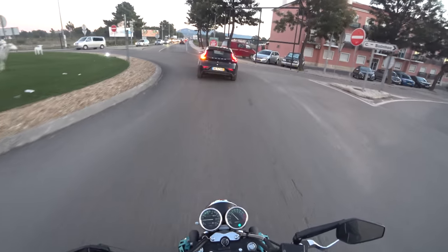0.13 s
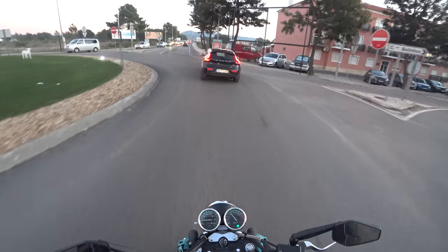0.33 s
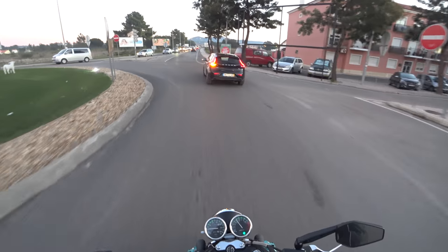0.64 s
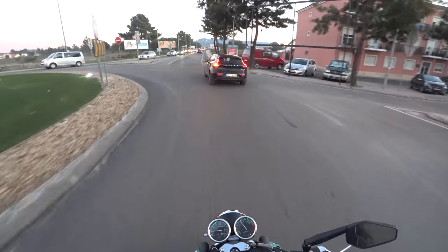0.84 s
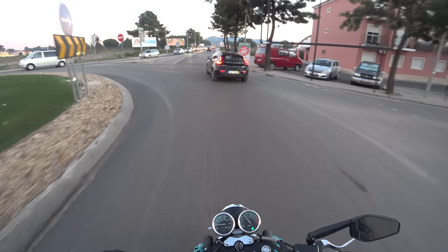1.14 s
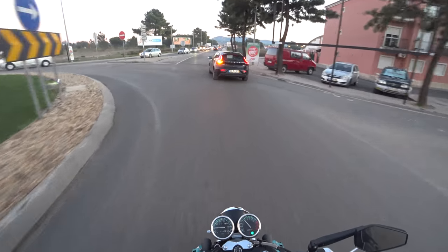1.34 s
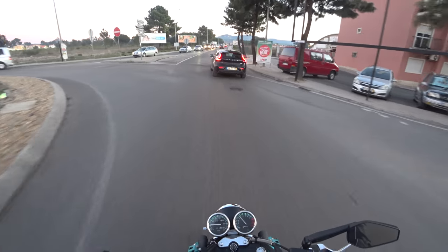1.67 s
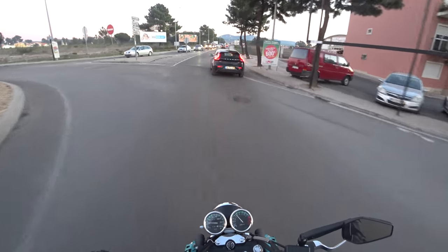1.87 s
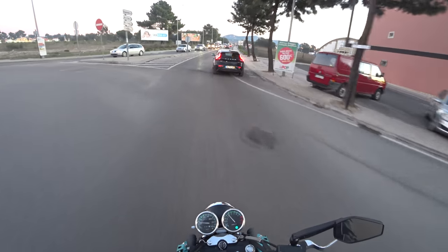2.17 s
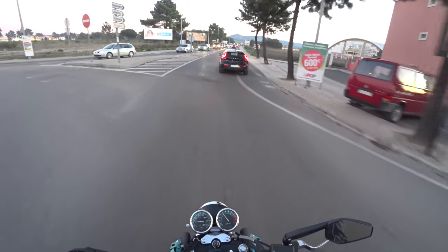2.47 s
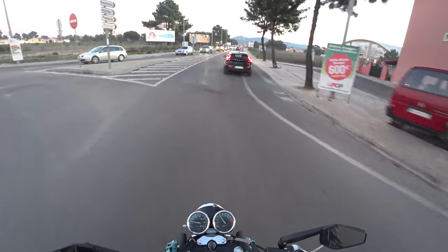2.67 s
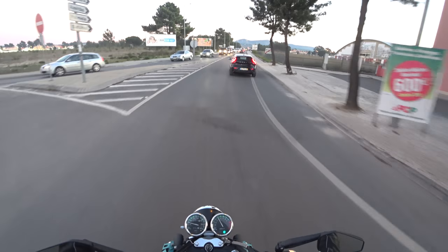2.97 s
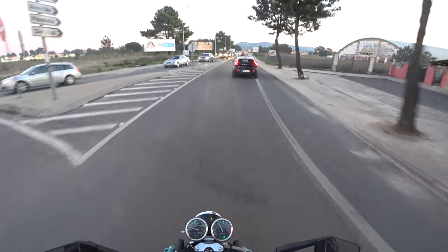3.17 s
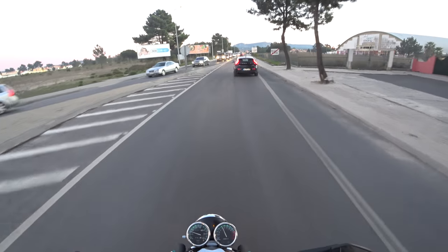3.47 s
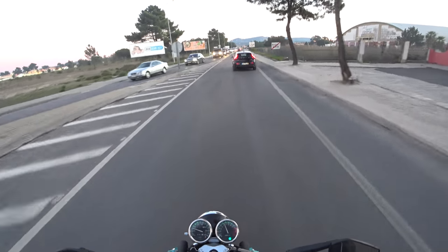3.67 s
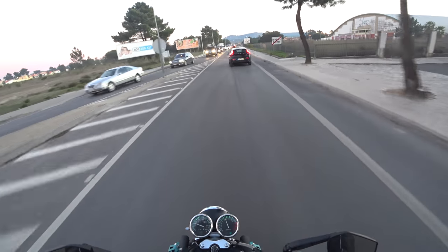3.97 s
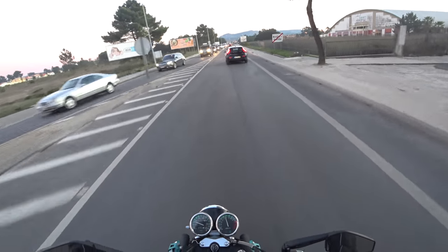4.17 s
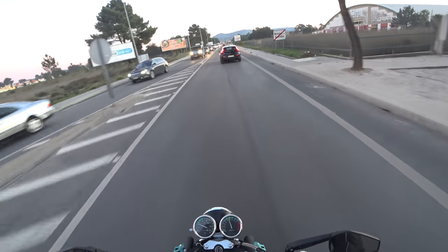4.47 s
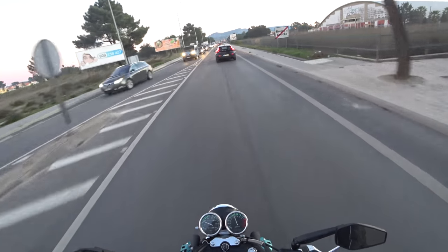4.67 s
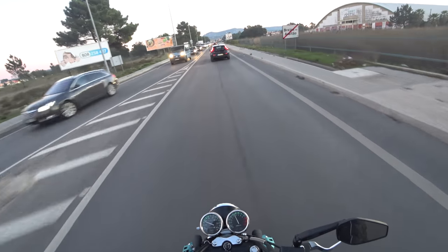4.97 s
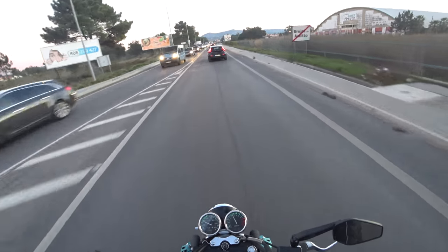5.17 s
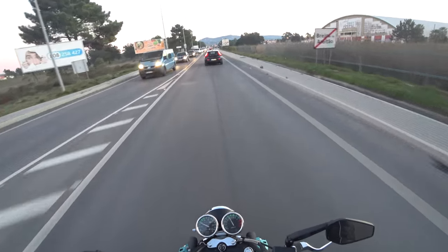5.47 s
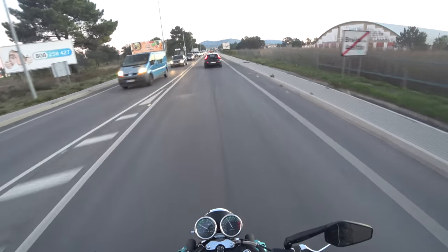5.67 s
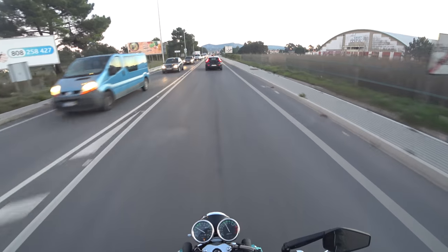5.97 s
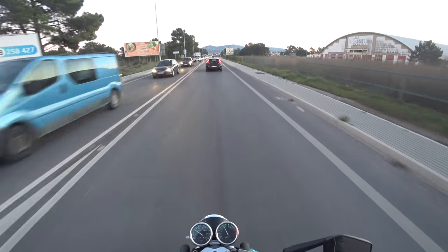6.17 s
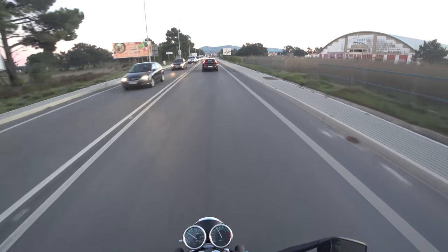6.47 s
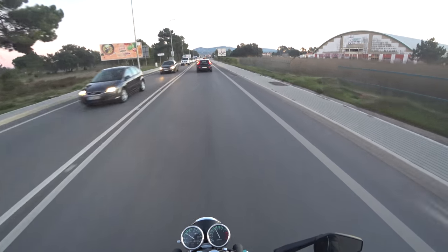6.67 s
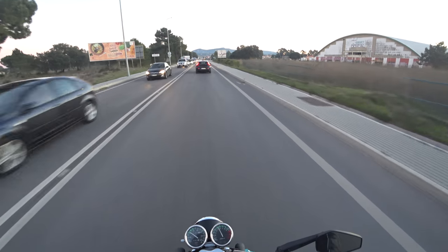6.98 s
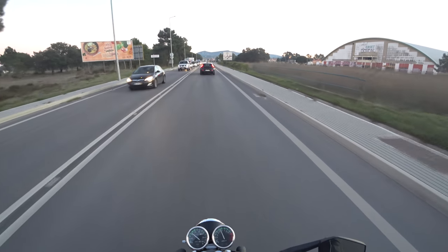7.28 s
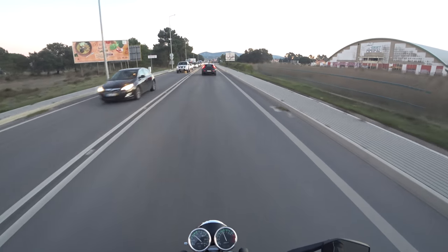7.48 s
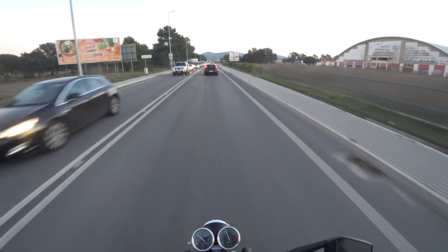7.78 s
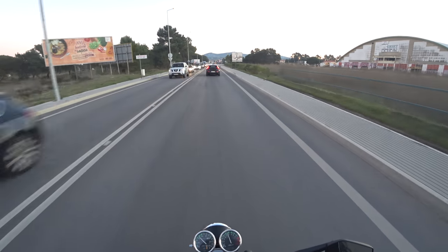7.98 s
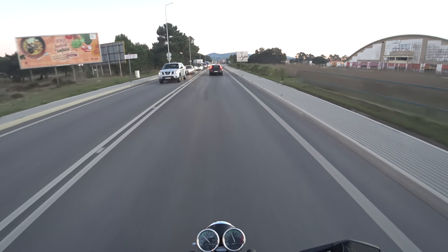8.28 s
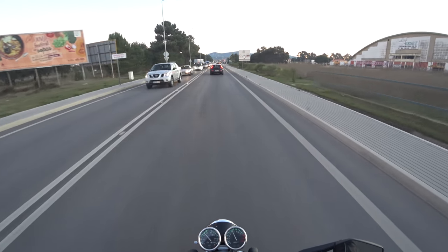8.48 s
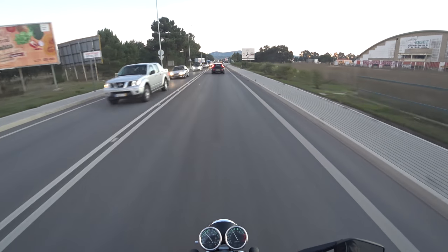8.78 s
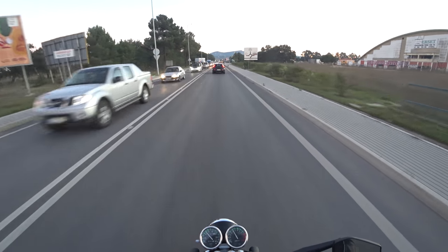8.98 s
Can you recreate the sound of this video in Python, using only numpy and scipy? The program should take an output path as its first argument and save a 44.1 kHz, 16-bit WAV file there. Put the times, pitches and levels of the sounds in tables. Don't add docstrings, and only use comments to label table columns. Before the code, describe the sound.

Inside a motorcyclist's helmet on an open road, a thumping one-cylinder engine rises in pitch and drops through three upshifts. The throttle cuts bring faint pops at the first, a loud quick cluster at the second, and two crackly ones at the third. Hollow boom, metallic exhaust ring, gas hiss and valve ticking sit close in stereo above tyre and wind noise.

```python
import sys
import numpy as np
from scipy import signal
from scipy.fft import rfft, irfft, next_fast_len
from scipy.io import wavfile
from scipy.ndimage import uniform_filter1d

SR = 44100
rng = np.random.default_rng(int(sys.argv[2]) if len(sys.argv) > 2 else 0)


def linear_from_db(decibels):
    return 10 ** (np.asarray(decibels, float) / 20)


def generate_wav(sig):
    pcm = np.round(np.clip(np.atleast_2d(sig).T, -1, 1) * 32767).astype(np.int16)
    wavfile.write(sys.argv[1], SR, pcm)


N = 402191
T = np.arange(N) / SR
SIZE = next_fast_len(N + 8192)
HZ = np.arange(SIZE // 2 + 1) * SR / SIZE
SNAP_S = 0.095

# centre_hz, width_hz, left_db, right_db, right_lead_rad
BOOM = [(102.4, 47, -24.5, -19, 0.5), (162, 170, -18.5, -41, -2), (234, 39, -21, -13, -1.4),
        (298.3, 45.4, 5.5, 8, -0.97), (371, 51, -1, -8, 2.44)]
PIPE = [(432.5, 102, -8, -7.5, -0.5), (552.3, 46, -4.5, -6, -2.5), (675.5, 88, -14.5, -9, 0.94),
        (782.7, 46.7, 0.5, 0.5, -2), (885, 136, 3, -1.5, -2.5), (1026, 86, -9, -12, -2),
        (1135, 170, -11, -11, -3), (1346, 290, -16.5, -15.5, -3), (1466, 400, -15, -17.5, -2.5),
        (1720, 110, -18.5, -10.5, -2.5), (1890, 150, -22.5, -19, -1.5)]
SHELL = [(1700, 1150, 6, 6, -2.5), (2453, 290, 3, 5.5, -2), (2795, 640, -1, -1, 0.6),
         (4270, 3360, -6.5, -4, 3)]
VENT = [(4840, 440, 0, 2.5, -1.1), (5560, 1040, 3.5, 6.5, -1.58), (7170, 1240, -4.5, -8.5, -1),
        (10070, 4300, -13, -17.5, 0.6)]
# firing_hz, level_db, lag_turns
BOOM_BY_REVS = [(35, -0.5, 0.034), (38.3, -3, -0.0068), (39.9, -2.5, -0.053), (43.13, -5.5, 0.056),
                (45.57, -3, 0.252), (48, -2.5, 0.486), (47.9, -2.5, 0.507), (55.3, -1.5, 0.481)]


def level(x, db):
    return x * linear_from_db(db) / np.sqrt(np.mean(x ** 2))


def ring(x, modes):
    hz, width, left_db, right_db, lead = np.transpose(modes)[:, :, None]
    grid = np.linspace(0, SR / 2, 4097)
    shape = np.minimum(grid / hz, 1) / (1 + ((grid - hz) / (width / 2)) ** 2)
    gain = np.sqrt([np.sum((linear_from_db(db) * shape) ** 2, axis=0) + 1e-12 for db in (left_db, right_db)])
    cepstrum = irfft(np.log(gain).mean(axis=0))
    phase = 2 * rfft(cepstrum[:4096], 8192).imag
    phase = phase + np.outer([0, 1], np.interp(grid, hz[:, 0], lead[:, 0]))
    gain = [np.interp(HZ, grid, g) * np.exp(1j * np.interp(HZ, grid, p)) for g, p in zip(gain, phase)]
    return irfft(rfft(x, SIZE) * gain, SIZE)[:, :N]


def driven(x, modes, db):
    return level(ring(x, modes), 0) * linear_from_db(db)


def noise(alike):
    common, left, right = rng.standard_normal((3, N))
    alike = np.clip(alike, 0, 1)
    return np.sqrt(alike) * common + np.sqrt(1 - alike) * np.array([left, right])


def colour(x, points):
    hz, db = np.transpose(points)
    return irfft(rfft(x, SIZE) * linear_from_db(np.interp(np.log(HZ + 1), np.log(hz), db)), SIZE)[:, :N]


def walk(rate):
    hold = int(SR / rate)
    steps = np.repeat(rng.standard_normal(N // hold + 1), hold)
    return 1.1 * uniform_filter1d(uniform_filter1d(steps, hold), hold)[:N]


def bump(s, length):
    return np.exp(-((T - s) / length) ** 2)


def clicks(seconds, size):
    out = np.zeros(N + 1)
    at = np.clip(seconds * SR, 0, N - 1)
    whole = at.astype(int)
    np.add.at(out, whole, size * (1 + whole - at))
    np.add.at(out, whole + 1, size * (at - whole))
    return out[:N]


def road(road_db, gust_db):
    # centre_hz, width_hz, left_db, right_db, right_lead_rad
    roar = [(393, 100, -10.5, -9.5, -1), (513, 46, -14, -4.5, -2.5), (684, 196, -7.5, -26, -.5),
            (839, 72, -2, -3, 0), (903, 170, -16, -17, -2), (1101, 130, -10.5, -4.5, -1.5),
            (1310, 240, -12, -11.5, -2.5), (1621, 250, -10.5, -8, -2), (1813, 137, -10, -9, -1.5)]
    # pitch_hz, level_db (per Hz)
    rumble = [(12, -59), (20, -16), (48, -16.5), (107, -3.5), (178, -7.5), (240, 4), (310, -50),
              (530, -120)]
    # time_s, level_db
    wind = [(0.0, -93), (0.62, -61.5), (0.9, -64.5), (1.1, -71.5), (4.11, -78), (4.37, -64), (7.16, -66),
            (7.6, -66), (8.03, -59.5), (9.12, -61)]
    out = driven(noise(0.67), SHELL, road_db + gust_db + walk(8))
    out += driven(noise(0.6), roar, road_db + 4.5 + walk(.6) + walk(12))
    buffet = linear_from_db(np.interp(T, *np.transpose(wind)) + 3 * walk(12))
    return out + level(colour(noise(0.52), rumble + [(500, -39)]), 1.14) * buffet


def gas(gas_db, turns):
    # centre_hz, width_hz, left_db, right_db, right_lead_rad
    visor = [(7820, 1800, -1, 3, -0.33), (10100, 3300, -2, -6, 0.36)]
    # time_s, level_db, length_s
    whistles = [
        (0.196, 2, 0.29),
        (2.7, 5, 0.28),
        (3.003, 5.5, 0.16),
        (3.7, 9, 0.082),
        (6.499, -1, 0.37),
        (7.5, 3.5, .3),
    ]
    pulse = 1 + 0.2 * np.cos(2 * np.pi * (turns - .3))
    out = driven(pulse * noise(0.86), VENT, gas_db + 0.58 * walk(24))
    whistle_db = sum(db * bump(s, length) for s, db, length in whistles)
    flutter_db = walk(3) + 3.5 * walk(9)
    return out + driven(noise(0.84), visor, gas_db - 17.5 + whistle_db + flutter_db)


def valve(tick_db, turns, cycle):
    late_s = .0003 * rng.standard_normal(len(cycle))
    size = linear_from_db(1.8 * rng.standard_normal(len(cycle)))
    tap = clicks(np.interp(cycle + .48, turns, T) + late_s, size)
    rattle = signal.oaconvolve(tap, np.exp(-T[:300] / .0013))[:N] * rng.standard_normal(N)
    # centre_hz, width_hz, left_db, right_db, right_lead_rad
    seat = [(5890, 1204, 16.0, 17.0, -1.66), (6820, 299, 7.5, 2.0, -0.96), (8890, 2800, -8.0, -8.0, 0.022)]
    return driven(.32 * rattle + .7 * tap, seat, tick_db + 1.0)


def pops():
    # time_s, peak_db, crack_db (over peak), return_ms, return_db
    bursts = [
        (0.932, -34, -30, 16.15, -4),
        (4.291, -25, -35, 13.8, -8),
        (4.331, -22.5, -36, 22, -4),
        (4.4486, -13.5, -29, 15.8, -0.5),
        (4.553, -32, -20, 13, -5),
        (4.641, -19, -38, 11.3, -4),
        (8.037, -27, -19, 16.4, -16),
        (8.145, -23.5, -39, 11.4, 3),
    ]
    # lag_s, size
    chatter = [
        (.0002, 6.5),
        (.0014, 2.7),
        (.0026, 6),
        (.0038, 8.7),
    ]
    # centre_hz, width_hz, left_db, right_db, right_lead_rad
    knock = [(794, 120, 0.5, -3.5, -2), (980, 270, 0, -4, -3), (1220, 300, -22.5, -3.5, -3),
             (1580, 360, -2, -3.5, -2.5)]
    # centre_hz, width_hz, left_db, right_db, right_lead_rad
    clunk = [(570, 81, -7, -10, -1.1), (1015, 125, -1, -1, -1.7), (1480, 150, -8, -6, -1.1)]
    body, crack = np.zeros(N), np.zeros(N)
    t = np.arange(2000) / SR
    for s, db, crack_db, back_ms, back_db in bursts:
        grit = rng.standard_normal(2000)
        blow = sum(size * np.exp(-np.abs(t - lag) / .00006) for lag, size in chatter)
        blow = blow + .5 * np.exp(-t / 0.001) * grit
        since = t - back_ms / 1000
        back = (t > back_ms / 1000) * np.exp(-np.abs(since) / 0.0086) * grit
        snap = np.exp(-np.abs(t - .001) / .0012) * grit
        back_snap = back * (.3 + 2 * np.exp(-np.abs(since) / .001))
        at = int((s - .0015) * SR)
        body[at:at + 2000] += linear_from_db(db) * (blow + linear_from_db(back_db + 5.0) * back)
        crack[at:at + 2000] += linear_from_db(db + crack_db) * (snap + back_snap)
    body = uniform_filter1d(body, size=7)
    out = linear_from_db(0.5) * ring(body, knock) + linear_from_db(-30) * ring(body, PIPE)
    out += linear_from_db(-11.5) * ring(body, BOOM) + linear_from_db(-25.5) * ring(body, SHELL)
    out += linear_from_db(8.0) * ring(crack, [(2680, 1600, -1.0, 3.0, -1.4)] + VENT[:2])
    return out + linear_from_db(-2.5) * ring(body, clunk)


def stroke(turns, orders=slice(0, 48)):
    # order, level_db, arrival_turns
    blow = [(0.99, 9, -.1), (6.64, 12, 0.012), (7.8, 9, 0.031), (9.8, 10, -0.029), (12.1, 11.5, -0.021),
            (13.95, 12.5, -0.014), (17.4, 8, 0.049), (17, 8, 0.017), (20.64, 8.5, 0.012), (25, 4.5, 0.022),
            (25.8, 1, 0.046), (27.9, 11, 0.045), (31.8, 6.5, 0.1), (48, 0, 0.23)]
    order = np.arange(1, 49)
    at, db, late = np.transpose(blow)
    turn = np.cumsum(np.interp(order, at, late))
    partials = linear_from_db(np.interp(order, at, db)) * np.exp(-2j * np.pi * turn)
    lines = np.zeros(2049, complex)
    lines[order[orders]] = partials[orders]
    return np.interp(turns % 1, np.arange(4097) / 4096, np.resize(irfft(lines), 4097))


def exhaust_blows(turns, hz):
    # firing_hz, trip_ms
    trip_by_revs = [(35, 5.18), (40, 4.975), (45, 4.927), (49, 4.702), (55, 4.55)]
    # time_s, first_return_db, second_return_db
    blows = [(0.0, -5, -26), (0.5, -12, -16), (1.1, -9, -17), (1.5, -5, -16), (1.75, -13, -12),
             (2.1, -6.5, -8), (2.4, -7, -5.5), (2.9, -5.5, -14), (3.5, -5, -23), (4.2, -5, -38),
             (4.8, -10, -20), (5.3, -6.5, -17), (6.0, -5, -20), (6.8, -9, -36), (7.8, -9, -24),
             (8.4, -13, -12), (9.12, -13, -11)]
    # time_s, ahead_db, main_db, first_return_db
    edges = [(0.0, -19, -1, -4), (0.5, -11, -1, -9), (1.1, -38, -3, -0.5), (1.5, -25, -10, 0.5),
             (1.75, -42, -1.5, -2.5), (2.1, -42, 0, -1.5), (2.4, -23, -1, -1), (2.9, -26, -1.5, 1),
             (3.5, -14, 1.5, 1.5), (4.2, -16, 0.5, 1.5), (4.8, -20, -7, 3), (5.3, -15, 1, 2),
             (6.0, -13, 0.5, 0.5), (6.8, -9.5, -0.5, -1.5), (7.8, -5, -0.5, -4.5), (8.4, -16, -6, 1.5),
             (9.12, -23, -6.5, 2.5)]
    trip = np.interp(hz, *np.transpose(trip_by_revs)) / 1000 * hz
    s, *levels = np.transpose(blows)
    body, last = (linear_from_db(np.interp(T, s, db)) for db in levels)
    s, *levels = np.transpose(edges)
    ahead, edge, keen = (linear_from_db(np.interp(T, s, db)) for db in levels)
    low, high = slice(0, 15), slice(15, 48)
    first = turns + trip
    wave = body * stroke(first - trip, low) + keen * stroke(first - trip, high)
    wave += ahead * stroke(first + trip, high) - last * stroke(first - 2 * trip)
    wave -= stroke(first, low) + edge * stroke(first, high)
    return wave, first


def header(turns, hz, voice):
    s, ring_hz, low_db, high_db = np.transpose(voice)
    since = turns % 1 / hz
    angle = 2 * np.pi * np.interp(T, s, ring_hz) * since + np.array([[0], [-2.4]])
    tones = linear_from_db(np.interp(T, s, low_db)) * np.sin(angle)
    tones = tones + linear_from_db(np.interp(T, s, high_db)) * np.sin(1.17 * angle)
    return tones * level(since * np.exp(-since / 0.0038), 3.2)


def engine(hz, exhaust_db, boom_db, gas_db, tick_db):
    # start_s, end_s
    shifts = [
        (.53, .93),
        (4.28, 4.73),
        (7.93, 8.4),
    ]
    # time_s, level_db, length_s
    flares = [
        (3.019, 8.5, 0.22),
        (3.951, 0, 0.22),
    ]
    # centre_hz, width_hz, left_db, right_db, right_lead_rad
    rasp = [(1006, 100, -3.5, -0.5, -1.3), (1165, 177, -2, -15, -0.44)]
    # time_s, pitch_hz, level_db (over exhaust), upper_db
    header_voice = [(0.0, 1544, -23, -18), (0.5, 1600, -26, -21), (1.3, 1480, -12, -30),
                    (1.8, 1512, -23, -15), (2.6, 1570, -25, -19), (2.9, 1630, -10.5, -28),
                    (3.5, 1670, -13, -32), (4.2, 1725, -23, -35), (4.9, 1530, -15, -25),
                    (5.5, 1564, -20, -25), (6.3, 1632, -14, -27), (7.0, 1692, -14, -34),
                    (7.8, 1693, -19, -29), (8.5, 1500, -28, -18), (9.12, 1530, -24, -24)]
    # time_s, pitch_hz, level_db, upper_db
    collector_voice = [(0.0, 1097, -18, -22), (0.5, 1130, -16, -18), (1.0, 1120, -10, -24),
                       (1.7, 1087, -14.5, -19), (2.3, 1147, -10.5, -19), (2.75, 1190, -12.5, -22),
                       (2.95, 1026, -17, -23), (3.5, 1047, -14, -25), (4.2, 1090, -13, -25),
                       (4.9, 1100, -17, -27), (5.4, 1135, -14.5, -27), (6.0, 1170, -16, -28),
                       (6.3, 1000, -16, -23), (7.0, 1034, -15, -23), (7.85, 1080, -17, -24),
                       (8.4, 1120, -16, -23), (9.12, 1140, -15, -25)]
    # time_s, length_s, order, level_db
    hums = [
        (0.68, 0.08, 15, -53),
        (0.966, 0.05, 32, -55),
        (1.03, 0.08, 24, -59),
        (4.85, 0.12, 7, -52),
        (1.2, 0.3, 12, -54.5),
        (4.598, 0.12, 15, -54),
    ]
    turns = np.cumsum(hz) / SR + .29
    cycle = np.arange(1, int(turns[-1]))
    shut = uniform_filter1d(sum((T > a) & (T < b) for a, b in shifts) * 1., size=2000)
    late = np.interp(turns, cycle, rng.standard_normal(len(cycle))) * (.001 + .0055 * shut)
    size = linear_from_db(np.interp(turns, cycle, rng.standard_normal(len(cycle))) * (1.1 + 2.2 * shut))
    wave, first = exhaust_blows(turns - late, hz)
    out = driven(size * wave, PIPE, exhaust_db - 2.8 * shut)
    boom_lag = np.interp(hz, *np.transpose(BOOM_BY_REVS)[::2])
    out += driven(size * stroke(first - boom_lag), BOOM, boom_db)
    song = header(first - .05, hz, header_voice) + header(first - .04, hz, collector_voice)
    out += size ** 2 * song * linear_from_db(exhaust_db - 5.3 * shut)
    for s, length, order, db in hums:
        hum = np.sin(2 * np.pi * round(order) * turns - np.array([[0], [1.5]]))
        out += linear_from_db(db + 4.5) * bump(s, length) * hum
    puff = np.exp(np.cos(2 * np.pi * (turns - .3)))
    flare_db = sum(db * bump(s, length) for s, db, length in flares)
    out += driven(puff * noise(.9), PIPE, exhaust_db - 19 + 8 * shut + flare_db)
    out += driven(puff * noise(0.95), rasp, exhaust_db - 22.5 + flare_db)
    out += driven(noise(0.85), BOOM, boom_db - 13.5 + 2.8 * shut)
    return out + gas(gas_db, turns) + valve(gas_db + tick_db, turns, cycle)


def throttle_effort():
    # time_s, exhaust_db
    effort = [(0.0, -40), (0.32, -37), (0.55, -40.5), (1.0, -49), (1.2, -49.5), (1.5, -43), (1.93, -39),
              (2.6, -39), (3.0, -37.5), (3.9, -36.5), (4.18, -36), (5.06, -40.5), (6.12, -39.5), (6.6, -36),
              (7.7, -36.5), (7.88, -37), (8.6, -43.5), (9.12, -42.5)]
    # shut_s, reopened_s, drop_db, roll_on_s
    throttle = [
        (0.488, 0.972, -5.5, 0.069),
        (4.228, 5.043, -10, 0.34),
        (7.848, 8.58, -7.5, 0.3),
    ]
    effort_db = np.interp(T, *np.transpose(effort))
    for shut, opened, db, roll in throttle:
        closed = np.clip(np.minimum((T - shut) / SNAP_S, (opened - T) / roll), 0, 1)
        effort_db = effort_db + closed * (db - 7.5 * (T - shut))
    return effort_db


def gearbox(hz):
    # bite_s, pulled_s, road_speed_per_rev, first_tick_db, last_tick_db
    gears = [
        (0.0, 0.49, 1.04, -14, -14),
        (1.052, 4.36, 1.3, -21, -2.5),
        (4.82, 7.85, 1.53, -1.5, -8.5),
        (8.5, 9.26, 2.12, -5.5, -2),
    ]
    ratio = sum(((T >= a) & (T <= b)) * r for a, b, r, *_ in gears)
    speed = np.interp(T, T[ratio > 0], (hz * ratio)[ratio > 0])
    bites, pulled, _, first_db, last_db = np.transpose(gears)
    coast_db = 0 * bites - 49
    corners = np.transpose([bites - SNAP_S, bites, pulled, pulled + SNAP_S]).ravel()
    ticks = np.transpose([coast_db, first_db, last_db, coast_db]).ravel()
    return 20 * np.log10(speed / 48), np.interp(T, corners, ticks)


def scene():
    # time_s, firing_hz
    revs = [(0.0, 45.43), (0.4, 49.33), (0.53, 50.04), (0.86, 43.49), (0.94, 35.7), (1.17, 35.0),
            (1.9, 39.86), (3.0, 48.05), (3.55, 51.36), (4.28, 54.65), (4.5, 47.2), (4.74, 42.43),
            (5.02, 41.72), (5.4, 43.35), (6.85, 48.0), (7.87, 50.82), (8.37, 38.93), (9.12, 39.84)]
    # time_s, boom_db, exhaust_db, length_s
    thumps = [(0.525, 3, 1.5, 0.025), (0.59, -3.5, -1.5, 0.049), (0.88, -1, 1, 0.044), (0.758, 4, 2, 0.021),
              (0.93, 5, 6.5, 0.023), (4.74, 3.5, 0.5, 0.03), (4.345, 12, 5, 0.023), (4.1, 0, -1.5, 0.055),
              (4.475, 6.5, 5, 0.075), (4.8, 9.5, 2, 0.15), (8.3, 10.5, 6, 0.012), (8.26, -8, -6, 0.038),
              (8.368, 0, -4, 0.024), (8.331, 3, 3, 0.026)]
    # time_s, level_db, length_s
    gusts = [
        (3.08, -0.5, 0.062),
        (3.597, -0.5, 0.11),
        (4.322, 0.5, 0.047),
        (4.466, 5, 0.015),
        (5.758, 1.5, 0.032),
        (6.04, 2.5, 0.078),
        (6.809, -1, 0.032),
        (7.078, 1.5, 0.041),
        (7.355, 2.5, 0.048),
        (8.34, 3, 0.067),
    ]
    hz = uniform_filter1d(np.interp(T, *np.transpose(revs)), size=2000)
    effort_db = throttle_effort()
    speed_db, tick_db = gearbox(hz)
    pull_db = effort_db + 41
    gust_db = sum(db * bump(s, length) for s, db, length in gusts)
    boom_db = -42.0 + 0.97 * pull_db + np.interp(hz, *np.transpose(BOOM_BY_REVS)[:2])
    boom_db = boom_db + sum(db * bump(s, length) for s, db, _, length in thumps)
    exhaust_db = effort_db + sum(db * bump(s, length) for s, _, db, length in thumps)
    gas_db = -59 + 0.48 * pull_db + speed_db + 0.97 * gust_db
    road_db = -57.5 + 0.19 * pull_db + 1.49 * speed_db
    out = road(road_db + 3.5, gust_db) + pops()
    return out + engine(hz, exhaust_db + 6.0, boom_db + 0.5, gas_db + 1.5, tick_db)


def low_pass(x):
    return signal.sosfilt(signal.butter(12, 16590, fs=SR, output="sos"), x)


def record(dry):
    # pitch_hz, level_db (per Hz)
    hiss = [(200, -32), (4000, -38), (9000, -24), (16000, -19)]
    # pitch_hz, level_db
    top = [(15650, 0), (15850, -70)]
    mix = dry + level(colour(noise(0.58), hiss), -70.0)
    return low_pass(colour(mix, top))


dry = scene()
out = record(dry)
generate_wav(out)
```